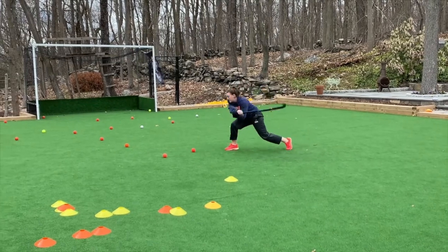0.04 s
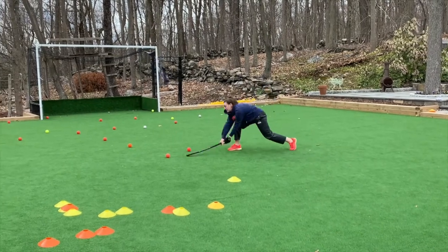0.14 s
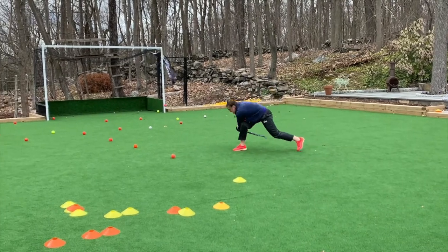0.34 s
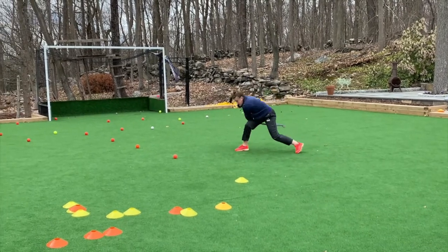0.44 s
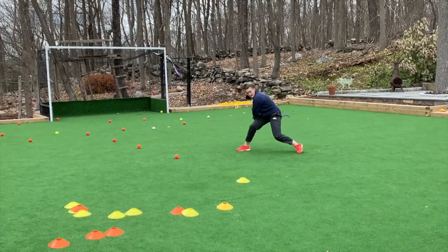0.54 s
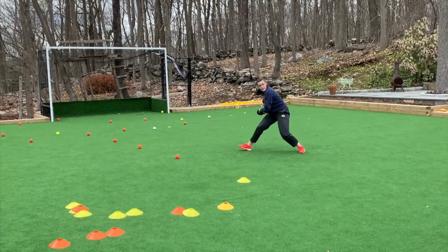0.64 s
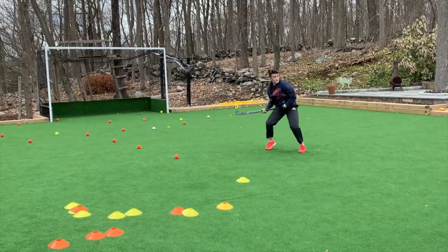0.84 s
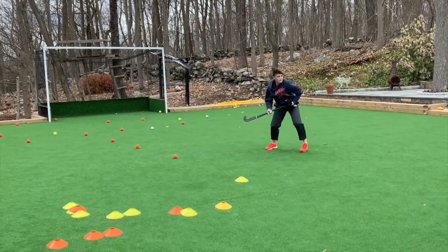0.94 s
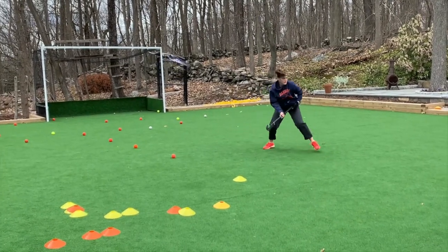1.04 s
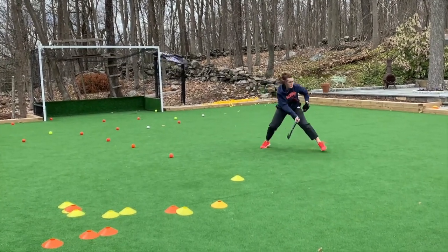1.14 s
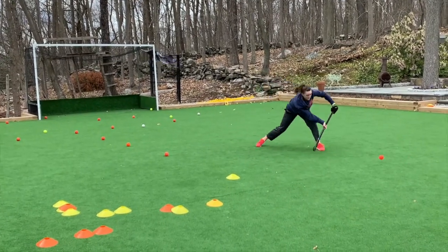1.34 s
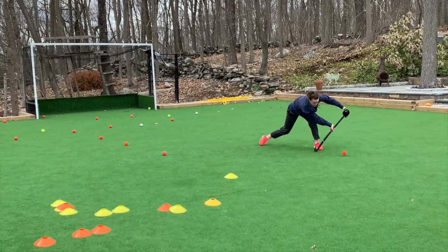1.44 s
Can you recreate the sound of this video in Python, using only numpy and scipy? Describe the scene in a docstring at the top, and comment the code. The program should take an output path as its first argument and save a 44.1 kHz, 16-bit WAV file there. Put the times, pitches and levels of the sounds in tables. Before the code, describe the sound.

A field hockey stick hits a ball with a sharp, echoing crack. A moment later the ball slams into the goal's metal-framed board, which rings and rattles. Faint steps on turf follow over a low outdoor rumble.

```python
"""Over a low outdoor rumble, a field hockey stick brushes the turf and cracks a ball away.
Stick and ball ring for an instant; a nearby wall and the woods throw the crack back.
Under half a second later the ball slams into a metal-framed board, which rings, thuds and rattles.
The ball drops to the turf, and soft steps, a dull thump and a light knock follow."""
import sys
import numpy as np
from scipy import signal
from scipy.fft import rfft, irfft
from scipy.io import wavfile

SR = 44100
rng = np.random.default_rng(int(sys.argv[2]) if len(sys.argv) > 2 else 0)


def wav_record(signal):
    """Record a signal, one row per channel, as 16-bit PCM in the file named by sys.argv[1]."""
    frames = np.transpose(np.atleast_2d(signal))
    bounded = np.clip(frames, -1, 1)
    # unit amplitude maps onto the largest positive 16-bit level
    quanta = np.round(bounded * 32767).astype(np.int16)
    wavfile.write(sys.argv[1], SR, quanta)


N = 66150
T = np.arange(N) / SR
HZ = np.maximum(np.fft.rfftfreq(N, 1 / SR), 1)
STRIKE_S = .2338
CONTACT_S = .00059   # how long the ball takes to flatten on the board
ECHO_CUTOFF_HZ = 7800

# stick and ball ringing together: pitch_hz, level_db, t60_s
STICK_BALL_MODES = [(714, -14.5, 0.021), (870, -14, 0.0093), (1173, -7, 0.031), (1366, -11, 0.015),
                    (1640, -9.5, 0.014), (2057, -21.5, .02), (3080, -18, 0.008), (3710, -17, 0.013),
                    (4650, -17.5, 0.012), (5980, -25, .011), (6540, -24.5, 0.019), (8258, -23, 0.0083),
                    (9940, -25, 0.0051)]
# tone of the crack: frequency_hz, level_db
CRACK_COLOUR = [(450, -14.5), (800, -0.5), (1750, -0.5), (2400, -11), (3200, -6.5), (4700, -14),
                (9000, -17.5), (14000, -30.5)]
# ball on board, a glancing touch and then the full hit: start_s, level_db, cutoff_hz
BOARD_HITS = [(0.6632, -10, 6940), (0.6704, 0, 9200)]
# the board's short, hard ring: pitch_hz, level_db, t60_s
PANEL_MODES = [(563, -36, 0.029), (852, -22, 0.036), (1070, -20, 0.034), (1606, -13.5, 0.019),
               (2050, -7.5, 0.014), (2556, -22.5, 0.0073), (2915, -14, 0.019), (3500, -14, .004),
               (4200, -13, 0.015)]
# the board chattering against its frame: start_s, level_db
CHATTER_HITS = [(.6805, -20), (.687, -24), (.6975, -14.5)]
# the metal frame's longer ring: pitch_hz, level_db, t60_s
METAL_MODES = [(538, 2, .15), (862, -2, .1), (1028, -8, .1), (1620, -6, .2), (2088, -7, .13),
               (2740, -16, .14), (2938, -6, .17), (3171, -13, .22), (3600, -14, .14)]
# the frame's bright ping, three close modes that beat: pitch_hz, level_db, t60_s
FRAME_PING_MODES = [(4036, -11, .4), (4067, 0, .26), (4079, -4, .26)]
# loose parts shaken by the slam: start_s, level_db, t60_s
CLATTER_BURSTS = [(0.663, -19.5, 0.084), (0.68, -26, 0.22)]
# tone of the loose parts: frequency_hz, level_db
CLATTER_COLOUR = [(150, 0), (330, 3), (440, 6), (650, 0.5), (1300, 1), (2000, -3.5), (2500, -3.5),
                  (3400, -0.5), (5300, -10), (10000, -16.5), (14000, -24)]
# tone of the ball's first slap on the board: frequency_hz, level_db
BOARD_SLAP_COLOUR = [(2000, 4), (4000, 12), (6000, -4), (8600, 8), (14000, -9)]
# dull thumps of board and ground: start_s, pitch_hz, level_db, t60_s
THUMP_HITS = [(0.522, 159, -26, 0.05), (0.683, 71, -21, 0.062), (0.773, 255, -28, 0.11),
              (1.1685, 272, -17, 0.024), (1.1665, 600, -29, 0.015)]
# light knocks of the dropping ball, soft footsteps and the ball on the wooden border: start_s, level_db, t60_s
KNOCK_HITS = [(0.7656, -27, 0.11), (0.865, -37, 0.15), (0.93, -39.5, 0.16), (1.218, -32, 0.14)]
# tone of the knocks: frequency_hz, level_db
KNOCK_COLOUR = [(150, 3), (700, 6.5), (1150, 1.5), (1750, -7.5), (2500, -25), (4400, -12.5), (7000, -32.5)]
# the ring of the wooden border as the ball knocks on it: pitch_hz, level_db, t60_s
BORDER_KNOCK_MODES = [(366, -4, .1), (490, -6, .09), (688, -2, .08), (942, -2, .12), (1234, -7, .06),
                      (1690, -10, .05), (4400, -14, .06)]
# stick, ball and shoes brushing the turf: start_s, level_db, rise_s, t60_s
BRUSH_STROKES = [(0.218, -30.5, 0.0017, 0.085), (0.655, -31, 0.0062, 0.026), (0.765, -38.5, 0.0029, 0.35),
                 (0.925, -44.5, 0.0086, 0.25), (1.095, -50, 0.01, 0.3), (1.217, -45, 0.02, 0.36)]
# tone of the plastic grass: frequency_hz, level_db
BRUSH_COLOUR = [(500, 9.5), (1800, 7.5), (3000, -1.5), (5500, -2.5), (9500, -5), (14000, -32)]
# returns from goal, stone wall and trunks: delay_s, level_db
FAR_ECHOES = [(.053, -21), (.0765, -23), (0.106, -24.5), (.156, -32)]
# reverb tails, from nearby and from among the trees: energy_db, rise_s, t60_s
WOODS_TAILS = [(-7, 0.0043, 0.26), (-10.5, 0.054, 0.98)]
# tone of the reverb: frequency_hz, level_db
WOODS_COLOUR = [(200, 3.5), (700, 3.5), (1300, 4), (2400, -2), (5000, 1), (9000, -8), (14000, -7.5)]
# tone of the outdoor bed: frequency_hz, level_db
AIR_COLOUR = [(22, -16), (54, -0.5), (176, -2.5), (202, -6), (344, -10), (450, -15.5), (833, -22),
              (1580, -25.5), (8320, -45), (11500, -59), (13100, -50.5), (15000, -62)]
# how alike left and right are in the bed: frequency_hz, correlation
AIR_CORRELATION = [(40, 0.43), (200, 0.77), (700, 0.063), (2000, 0.027), (8000, 0.035)]
# tone of the bed's low swell: frequency_hz, level_db
RUMBLE_COLOUR = [(40, -11), (88, 4), (150, -10.5), (400, -67), (2000, -77.5)]


def stick():
    """Stick meets ball: a very short contact rings both under a snap of noise."""
    body = amp(-.5) * ring(STRIKE_S, STICK_BALL_MODES, contact_s=.00021)
    snap = bursts(CRACK_COLOUR, [(STRIKE_S, -18.5, CONTACT_S, .036)])
    return place(body, left_lag_s=.00002) + snap


def board():
    """The ball slaps and slams the board; it chatters, the frame rings on and loose parts clatter."""
    slams = sum(amp(db) * dull(ring(s, PANEL_MODES), hz) for s, db, hz in BOARD_HITS)
    chatter = sum(amp(db) * ring(s, PANEL_MODES) for s, db in CHATTER_HITS)
    blows = place(slams + chatter, left_lag_s=.000374)
    full_hit_s = BOARD_HITS[-1][0]
    metal = amp(-24) * ring(full_hit_s, METAL_MODES)
    ping = amp(-24.5) * ring(.668, FRAME_PING_MODES)
    frame = place(metal + ping, left_lag_s=.00005)
    clatter = bursts(CLATTER_COLOUR, [(s, db, .002, t60) for s, db, t60 in CLATTER_BURSTS])
    slap = bursts(BOARD_SLAP_COLOUR, [(.663, -21, .001, .039)]) * amp([[-1], [1]])   # leans right
    return blows + amp(-3.5) * ground_reflection(blows) + frame + clatter + slap


def thumps():
    """Soft contacts, each a few cycles of one low resonance."""
    return -sum(amp(db) * envelope(s, .0029, t60) * np.sin(2 * np.pi * hz * (T - s))
                for s, hz, db, t60 in THUMP_HITS)


def turf():
    """Small foley: light knocks and steps, the ball ringing the wooden border and the swish of plastic grass."""
    rise_s = .0019
    knocks = bursts(KNOCK_COLOUR, [(s, db, rise_s, t60) for s, db, t60 in KNOCK_HITS])
    tap = amp(-33.5) * ring(1.2195, BORDER_KNOCK_MODES, contact_s=rise_s)
    return tap + knocks + bursts(BRUSH_COLOUR, BRUSH_STROKES)


def ground_reflection(x):
    """A reflection off the turf, just behind the direct sound."""
    return delay(x, .00128)


def wall(x):
    """A thin slapback off the wall behind the listener, reaching the left a hair sooner."""
    thin = signal.sosfilt(signal.butter(1, 3650, "high", fs=SR, output="sos"), x)
    left, right = amp(2.5) * dull(thin, ECHO_CUTOFF_HZ)
    echo_s, left_lead_s = .0186, .000066
    return np.array([delay(left, echo_s - left_lead_s), delay(right, echo_s)])


def far_echoes(x):
    """A few distinct, darker returns from further away."""
    return sum(amp(db) * delay(dull(x, ECHO_CUTOFF_HZ), s) for s, db in FAR_ECHOES)


def radiated_crack():
    """The crack summed over all directions: a click with a smooth spectrum."""
    return delay(irfft(amp(by_hz(CRACK_COLOUR)), N), STRIKE_S)


def woods(x):
    """Many small, uneven echoes from fences and trunks blur into a reverb tail."""
    tails = [(db, envelope(.0034, rise, t60)) for db, rise, t60 in WOODS_TAILS]
    power = sum(amp(db) ** 2 * tail ** 2 / np.sum(tail ** 2) for db, tail in tails)
    response = np.sqrt(power) * noise(WOODS_COLOUR, correlation=.021) * flicker(depth_db=2, step_s=.0036)
    return signal.fftconvolve(x, amp(-1.5) * response, axes=1)[:, :N]


def air():
    """The outdoor bed: wavering rumble and faint hiss, with one low swell just after the strike."""
    correlation = by_hz(AIR_CORRELATION)
    swell = amp(-34) * envelope(start_s=.25, rise_s=.055, t60_s=.65) * noise(RUMBLE_COLOUR, correlation)
    bed = amp(-38.5) * noise(AIR_COLOUR, correlation) * flicker(depth_db=2, step_s=.05)
    return bed + swell


def amp(db):
    """Decibels to gain."""
    return 10 ** (np.asarray(db) / 20)


def by_hz(points):
    """A curve through (frequency_hz, value) points on a log-frequency axis."""
    hz, value = np.transpose(points)
    return np.interp(np.log(HZ), np.log(hz), value)


def noise(colour, correlation):
    """Coloured stereo noise of rms 1; the lower the correlation, the wider it sits."""
    mid, side = rfft(rng.standard_normal((2, N)))
    stereo = np.sqrt(1 + correlation) * mid + np.sqrt(1 - correlation) * side * [[1], [-1]]
    x = irfft(amp(by_hz(colour)) * stereo, N)
    return x / x.std()


def flicker(depth_db, step_s):
    """A gain of rms 1 that glides to a new random level every step."""
    gain = amp(depth_db * np.interp(T / step_s, np.arange(N), rng.standard_normal(N)))
    return gain / np.sqrt(np.mean(gain ** 2))


def envelope(start_s, rise_s, t60_s):
    """A straight attack, then an exponential decay."""
    age = T - start_s
    return np.clip(age / rise_s, 0, 1) * amp(-60 * np.maximum(age - rise_s, 0) / t60_s)


def ring(start_s, modes, contact_s=CONTACT_S):
    """Struck, damped modes that build during the contact and alternate in polarity."""
    age = T - start_s
    return sum((-1) ** k * amp(db) * envelope(start_s, contact_s, t60) * np.sin(2 * np.pi * hz * age)
               for k, (hz, db, t60) in enumerate(modes))


def bursts(colour, rows):
    """Wide, grainy noise bursts, one per row: start_s, level_db, rise_s, t60_s."""
    power = sum((amp(db) * envelope(s, rise, t60)) ** 2 for s, db, rise, t60 in rows)
    return np.sqrt(power) * noise(colour, correlation=.097) * flicker(depth_db=2, step_s=.0017)


def delay(x, delay_s):
    """The same sound, shifted later."""
    return irfft(rfft(x) * np.exp(-2j * np.pi * HZ * delay_s), N)


def place(x, left_lag_s):
    """Pan by arrival time: the left side hears it later."""
    return np.array([delay(x, left_lag_s / 2), delay(x, -left_lag_s / 2)])


def dull(x, cutoff_hz):
    """Gentle low-pass."""
    return signal.sosfilt(signal.butter(2, cutoff_hz, fs=SR, output="sos"), x + 1e-18)


def scene():
    """Crack, slam and small foley up front; echoes, reverb and the outdoor bed behind."""
    crack, slam, foley = stick(), board(), thumps() + turf()
    reverb_send = amp(20) * radiated_crack() + amp(-14) * crack + amp(-8.5) * slam + amp(-7) * foley
    reflections = ground_reflection(crack) + wall(crack) + far_echoes(crack)
    return crack + slam + foley + reflections + woods(reverb_send) + air()


def record(dry):
    """Roll off the deepest rumble, round the highest peaks and cut the very top."""
    low_cut_hz, ceiling, stopband_hz = 36, .81, 16060
    trimmed = signal.sosfilt(signal.butter(2, low_cut_hz, "high", fs=SR, output="sos"), dry)
    rounded = trimmed / (1 + (trimmed / ceiling) ** 4) ** .25
    return signal.sosfilt(signal.cheby2(12, 70, stopband_hz, fs=SR, output="sos"), rounded)


dry = scene()
out = record(dry)
wav_record(out)
```